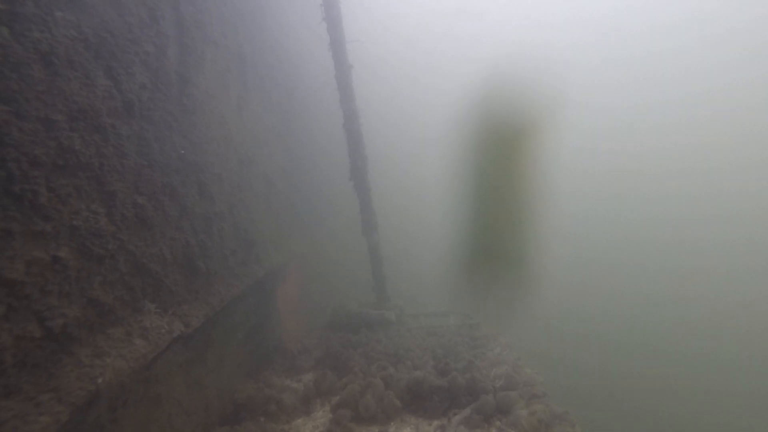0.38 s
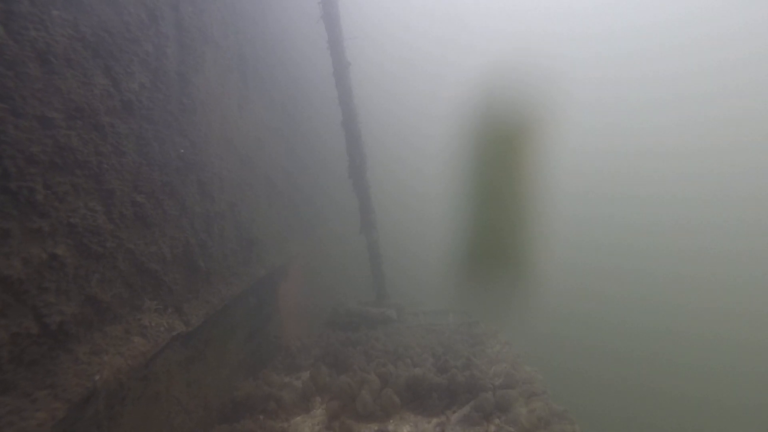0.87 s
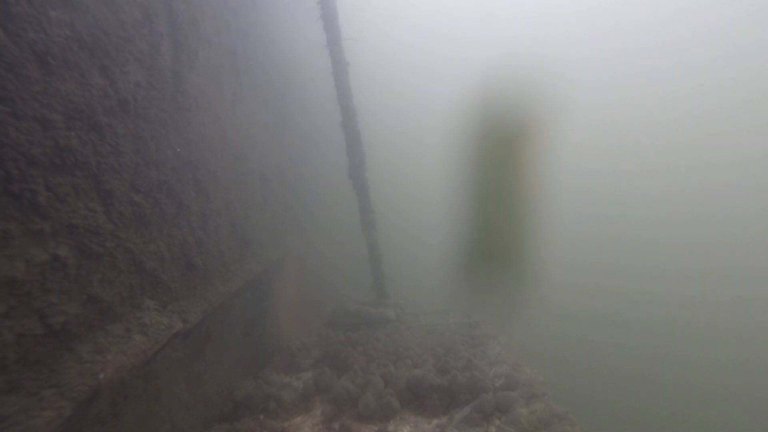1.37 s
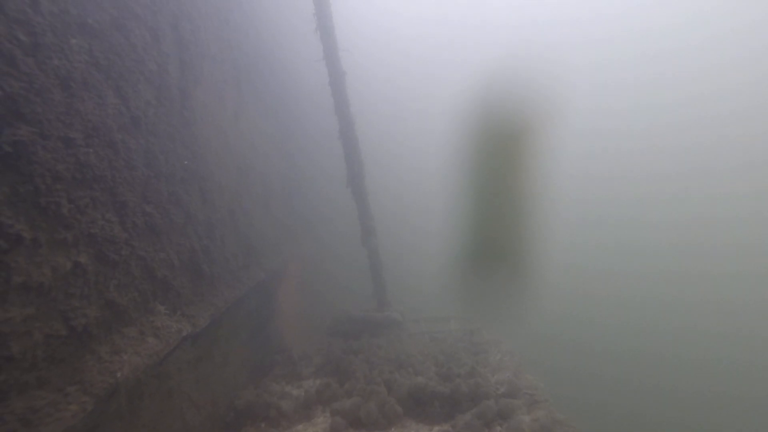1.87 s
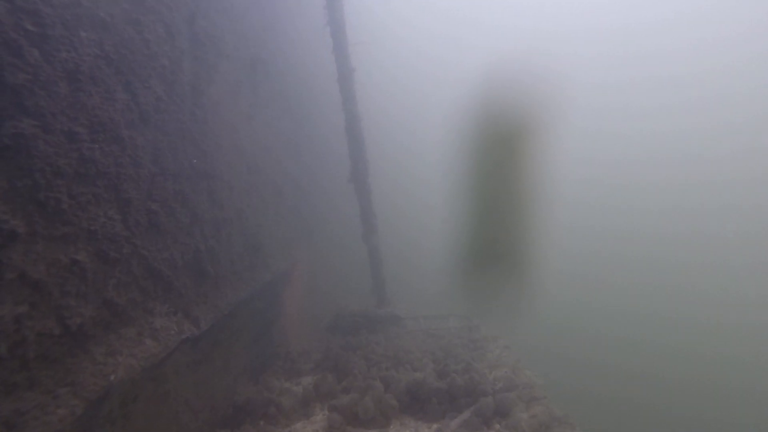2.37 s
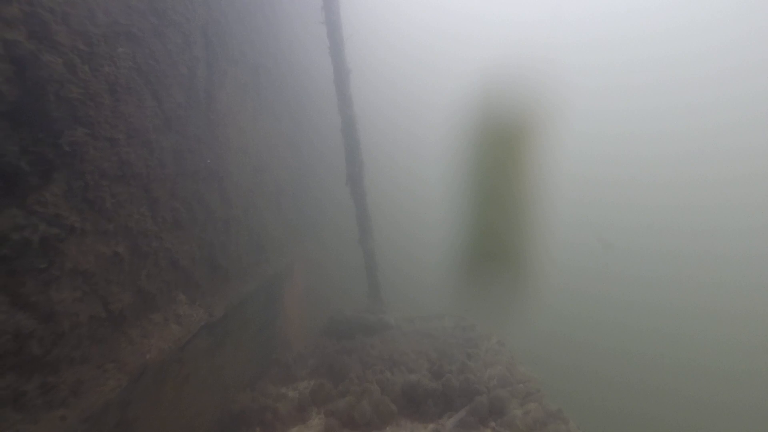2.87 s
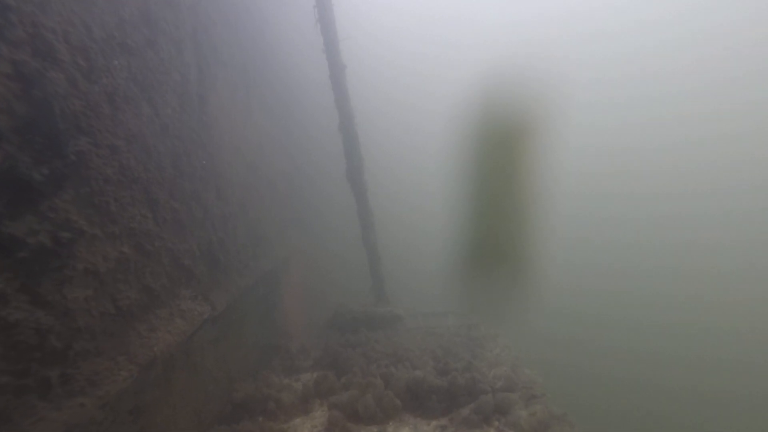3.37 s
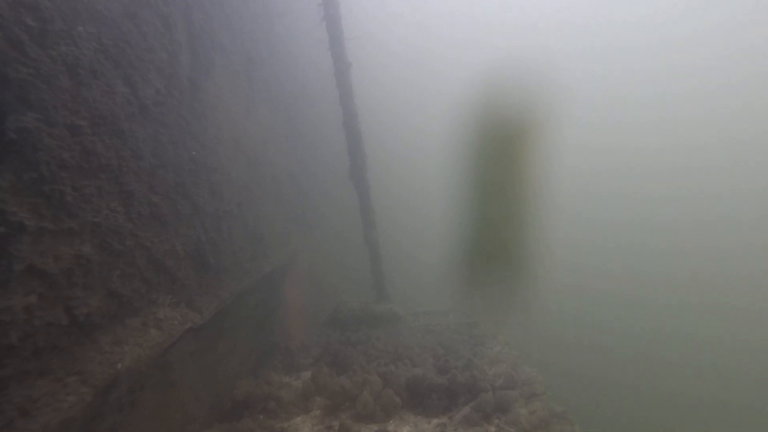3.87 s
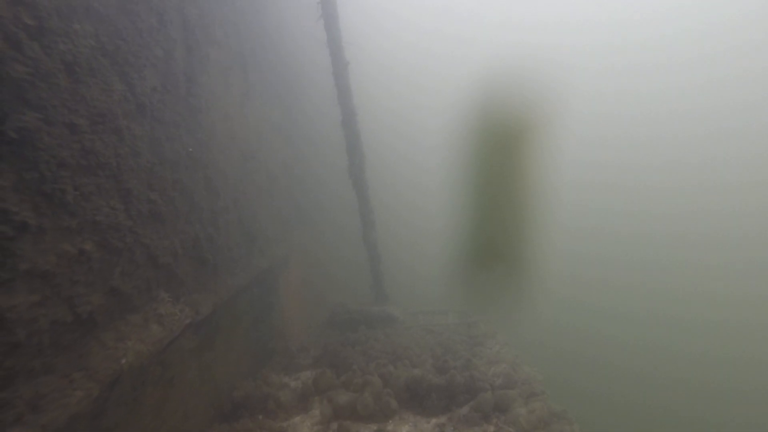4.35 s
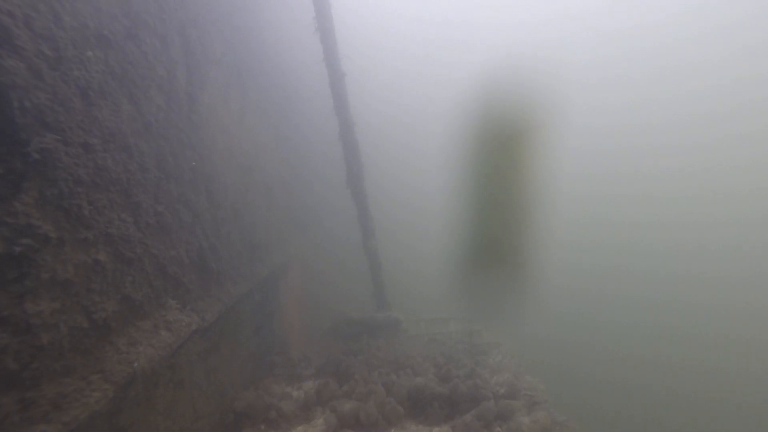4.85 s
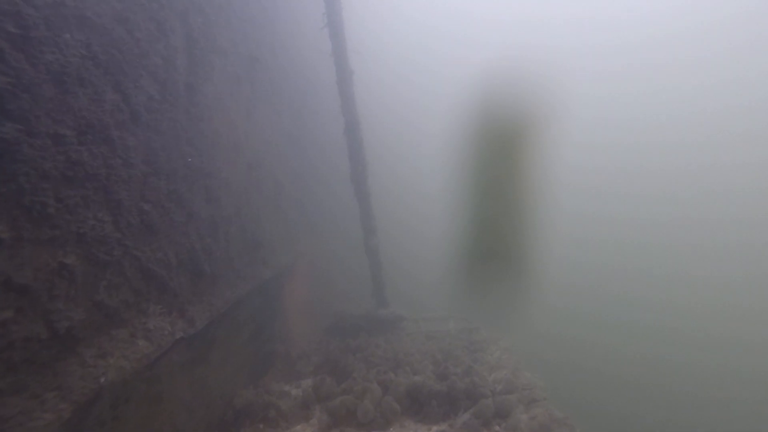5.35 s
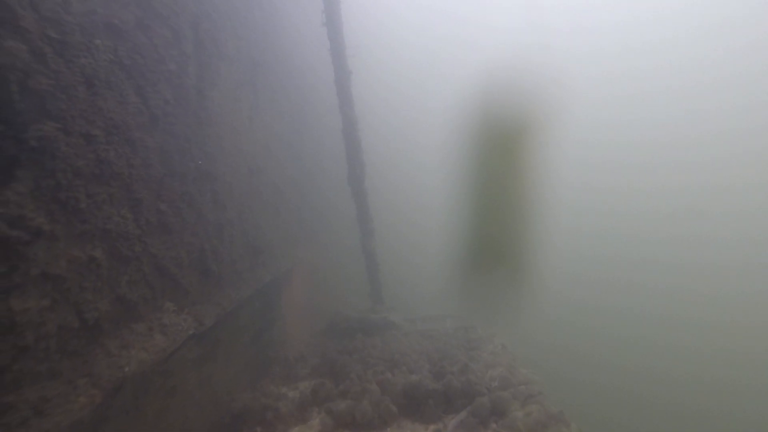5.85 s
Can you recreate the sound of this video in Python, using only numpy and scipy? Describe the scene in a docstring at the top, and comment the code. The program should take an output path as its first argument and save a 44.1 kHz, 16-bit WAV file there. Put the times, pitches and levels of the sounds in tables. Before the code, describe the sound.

Murky harbour underwater: low engine hum and dull wash, sloshing gurgles, hollow knocks, bubbles, and heavy booming thumps on a moored hull.

```python
"""Harbour under water

Heard through a camera housing: a distant engine hums at a low pitch as a few drifting sines, over a
steady dull wash of shaped noise. Waves slosh and gurgle at the quay wall overhead as noise that follows
their levels. Grit ticks, hollow knocks of the housing near 600 Hz and bubbles, mostly higher, are short
dying sines; a moored hull is knocked and rings at its modes. Scattered echoes follow all but hum and water."""
import sys
import numpy as np
from scipy import signal
from scipy.io import wavfile
from scipy.ndimage import uniform_filter1d

SR = 44100
rng = np.random.default_rng(int(sys.argv[2]) if len(sys.argv) > 2 else 0)


def elevation(decibels):
    """Turn decibel levels (scalar or array-like) into linear amplitude ratios."""
    levels = np.asarray(decibels, float)
    return 10 ** (levels / 20)


def bounce(signal):
    """Save signal as a 16-bit WAV file at the path given by the first command-line argument."""
    frames = np.transpose(np.atleast_2d(signal))
    limited = np.clip(frames, -1, 1)
    pcm = np.round(limited * 32767).astype(np.int16)
    wavfile.write(sys.argv[1], SR, pcm)


N = 274743  # length in samples


def evened(x):
    """Normalisation: scales a signal to rms 1."""
    return x / np.sqrt(np.mean(x ** 2) + 1e-20)


def add(mix, start_s, sound):
    """Superposition: mixes a sound in at start_s, cut off at the end of the mix."""
    part = mix[round(start_s * SR):][:len(sound)]
    part += sound[:len(part)]


def slow(top_hz):
    """Random modulation: twelve slow sines of chance phase, up to top_hz, with rms 1 in sum."""
    t = np.arange(N) / SR
    rates = np.geomspace(0.2, top_hz, num=12)
    return evened(sum(np.sin(2 * np.pi * (f * t + rng.random())) / np.sqrt(f) for f in rates))


def noise(spectrum, patchy_db, flicker_db, size):
    """Short-time synthesis: random spectra with drifting patches and a flicker shared by all bins."""
    hz = np.fft.rfftfreq(size, 1 / SR)
    frames = 4 * N // size + 8
    real, imaginary, patches = rng.standard_normal((frames, len(hz), 3)).T
    patches = uniform_filter1d(patches, size=size // 100, axis=0)  # smooth over frequency
    patches = evened(uniform_filter1d(patches, size=6, axis=1))  # smooth over time
    flicker = evened(uniform_filter1d(rng.standard_normal(frames), size=3))
    corner_hz, corner_db = np.transpose(spectrum)
    colour_db = np.interp(np.log(hz + 1), np.log(corner_hz), corner_db, left=-90)[:, None]
    level_db = colour_db + patchy_db * patches + flicker_db * flicker
    spectra = (real + 1j * imaginary) * elevation(level_db)
    return evened(signal.istft(spectra, nperseg=size, noverlap=size - size // 4)[1][:N])


def resonate(x, hz, width):
    """Resonance of gain 1: shifts hz down to zero, smooths with a one-pole filter and shifts back."""
    turn = np.exp(2j * np.pi * hz * np.arange(len(x)) / SR)
    r = np.exp(-np.pi * width / SR)
    return 2 * (turn * signal.lfilter([1 - r], [1, -r], x / turn)).real


def ping(hz, t60, rise, glide=0., sharp=0.):
    """Damped oscillation of peak about 1 with a soft start; it may slide, or start sharp and settle."""
    t60 = max(t60, 0.002)
    t = np.arange(round(SR * (t60 + 4 * abs(rise)))) / SR
    shape = (1 - np.exp(-t / max(rise, 1e-4))) * elevation(-60 * t / t60)
    cycles = hz * (t + glide * t ** 2 / t60)
    cycles += sharp * (1 - np.exp(-hz * t / 0.19))  # the sharp start settles within a cycle
    return shape / shape.max() * np.sin(2 * np.pi * cycles)


# Swells of the hum, one multiple at a time. Each row: middle in seconds, half-width to 1/e in seconds,
# top rms level in dB, multiple of the firing pitch.
HUM_SWELLS = [(0.17, 0.46, -42, 2), (0.076, 0.48, -43, 3), (.25, 0.53, -41, 1), (0.98, 0.23, -38.5, 2),
              (1.16, 0.4, -30.5, 1), (1.6, 0.2, -37.5, 3), (1.8, 0.29, -37.5, 1), (1.78, 0.18, -41.5, 2),
              (2.014, 0.163, -34.5, 3), (1.9, 0.17, -44, 2), (2.33, 0.33, -40, 1), (2.7, .15, -34.5, 1),
              (3.27, .18, -36, 1), (3.15, 0.13, -29.5, 3), (3.67, 0.096, -32, 1), (3.5, .1, -50, 2),
              (3.5, 0.13, -36.5, 3), (3.87, 0.086, -33.5, 3), (4.2, .2, -41, 1), (4.1, 0.13, -40, 2),
              (5.22, 0.29, -33.5, 2), (5.35, 0.16, -37.5, 3), (5, 0.073, -49, 1), (5.85, 0.28, -36.5, 1),
              (8.4, 0.1, -36, 3)]
FIRING_HZ, DRIFT_HZ = 38.75, 0.3  # engine pitch and the rms of its slow drift
HUM_REST_DB = (-55, -48, -50.5)  # resting rms level of multiples 1, 2, 3
NEIGHBOUR_HZ, NEIGHBOUR_DB = 43.27, -46  # wavering tone above the lowest multiple, rms level


def engine():
    """Harmonic series: three multiples of the firing pitch swell singly; narrow noise adds a neighbour."""
    t = np.arange(N) / SR
    turns = np.cumsum(FIRING_HZ + DRIFT_HZ * slow(3.5)) / SR
    levels = elevation(HUM_REST_DB)[:, None] * np.ones(N)
    for middle, width, db, multiple in HUM_SWELLS:
        swell = elevation(db) * np.exp(-((t - middle) / width) ** 2)
        levels[round(multiple) - 1] = np.maximum(levels[round(multiple) - 1], swell)
    hum = sum(np.sqrt(2) * level * np.sin(2 * np.pi * (k * turns + rng.random()))
              for k, level in enumerate(levels, 1))
    neighbour = resonate(rng.standard_normal(N), NEIGHBOUR_HZ, 5.6)
    neighbour = resonate(neighbour, NEIGHBOUR_HZ, 4.7)
    return hum + elevation(NEIGHBOUR_DB) * evened(neighbour)


# Colour of the wash. Each row: frequency in Hz, relative spectral density in dB.
WASH = [(12, -32), (20, 5), (47, -18), (126, -18), (140, -30), (170, -19), (196, -40), (323, -66),
        (549, -15.5), (957, -29.5), (1920, -32), (2400, -31.5), (3350, -33.5), (7300, -43.5),
        (15500, -52.5)]


def wash():
    """Stationary coloured noise: the steady dull wash, at a fixed rms level."""
    return elevation(-48.5) * noise(WASH, 0.67, 0.23, size=2048)


# Waves meeting the wall. Each row: start in seconds, length in seconds, splash level in dB,
# gurgle level in dB before an 8 dB cut, low surge level in dB before the hull's answer.
WAVES = [(0.845, .06, -72, -63, -54), (.92, 0.027, -56, -55, -47), (0.983, 0.037, -58, -47, -45),
         (1.356, 0.099, -52, -48, -40), (1.42, 0.085, -51.5, -66, -37), (1.526, 0.16, -58, -57, -37.5),
         (1.7, 0.37, -60, -45.5, -43.5), (2.151, 0.083, -48, -46, -37), (2.254, 0.044, -47.5, -39.5, -39),
         (2.305, 0.12, -44.5, -39.5, -37.5), (2.473, 0.39, -59, -51, -42.5), (2.695, .03, -55, -39, -36),
         (2.732, 0.033, -51, -36, -38), (2.803, 0.018, -49.5, -32, -37.5),
         (2.857, 0.055, -51, -48.5, -38.5), (2.943, 0.085, -48.5, -28.5, -30),
         (3.079, 0.048, -43, -28, -21), (3.164, 0.012, -43.5, -46, -34), (3.25, 0.027, -56, -40, -30),
         (3.3, 0.31, -55.5, -45.5, -37.5), (3.635, 0.034, -48.5, -36.5, -29.5), (3.72, .16, -54, -43, -36),
         (3.91, 0.087, -56.5, -37, -37), (4.037, 0.45, -59.5, -48.5, -39.5),
         (4.435, 0.033, -47.5, -28.5, -36), (4.48, 0.079, -46.5, -32, -34), (4.582, .12, -55, -40.5, -38),
         (4.722, 0.034, -51, -38.5, -42.5), (4.778, 0.055, -53.5, -33.5, -38),
         (4.847, 0.13, -53, -35.5, -39), (4.954, 0.094, -61, -39.5, -46), (5.06, 0.018, -47, -28.5, -22),
         (5.105, 0.038, -61, -33.5, -45), (5.162, 0.061, -44.5, -34, -26.5),
         (5.237, 0.047, -52.5, -37, -36), (5.3, 0.062, -45, -48, -32.5), (5.383, 0.1, -49, -48, -36),
         (5.445, 0.033, -43, -37, -31), (5.646, 0.021, -55, -43.5, -37.5), (5.774, 0.17, -53, -49.5, -38.5),
         (5.886, 0.039, -60, -50, -34), (5.94, 0.081, -54, -35, -28.5), (6.045, 0.058, -55, -40.5, -35),
         (6.104, 0.011, -52, -30, -25), (6.137, 0.024, -45, -30, -30), (6.195, .02, -63, -33, -25)]
# column in WAVES, calm level in dB, rise in s, fall in dB per s
SPLASH_SHAPE, GURGLE_SHAPE, SURGE_SHAPE = (2, -61, 0.028, 315), (3, -52, 0.023, 250), (4, -46, 0.054, 200)


def wave_db(column, calm_db, rise, fall_db):
    """Power summation: a calm level plus each wave rising, holding for its length and falling away."""
    power = np.full(N, elevation(2 * calm_db))
    for wave in WAVES:
        start, length, db = wave[0], wave[1], wave[column]
        t = np.arange(round(SR * (rise + length + 40 / fall_db))) / SR
        falling_db = db - fall_db * np.maximum(t - length - rise / 2, 0)
        envelope = np.minimum(t / rise, 1) * elevation(falling_db)
        add(power, max(start - rise / 2, 0), envelope ** 2)
    return 10 * np.log10(power)


# Colour of the splash. Each row: frequency in Hz, relative spectral density in dB.
SPLASH = [(250, -22), (500, 11.5), (1000, -0.5), (1300, 4.5), (1750, 2), (2080, -2), (2700, 0), (3100, -3),
          (3500, -9.5), (4800, -11.5), (7000, -18.5), (11000, -23.5), (15500, -55)]


def splash():
    """Amplitude modulation: patchy, flickering noise follows the splash level of the waves."""
    return elevation(wave_db(*SPLASH_SHAPE)) * noise(SPLASH, 3.6, 1.0, size=256)


# Housing resonances that gurgle. Each row: frequency in Hz, width in Hz of each of two stages,
# relative level in dB.
GURGLE = [(581, 217, 3), (650, 82, 4), (740, 69, 0)]


def gurgle():
    """Forced resonance: clumped shoves of water make the housing sound its own notes."""
    clumps = evened(uniform_filter1d(rng.standard_normal(N), size=500))
    shoves = rng.standard_normal(N) * elevation(3.15 * clumps)
    notes = sum(elevation(db) * resonate(resonate(shoves, hz, width), hz, width) for hz, width, db in GURGLE)
    return elevation(wave_db(*GURGLE_SHAPE) - 8) * evened(notes)


# Colour of the surge. Each row: frequency in Hz, relative spectral density in dB.
SURGE = [(15, -20), (35, 7.5), (70, -1.5), (130, -1), (250, -13), (400, -16), (700, -17.5), (2000, -105)]


def surge():
    """Forced vibration: low noise follows the waves and shakes the hull, which answers at its modes."""
    push = elevation(wave_db(*SURGE_SHAPE)) * noise(SURGE, 2.4, 0.55, size=1024)
    answer = sum(elevation(0.29 * db + hz / 40) * resonate(push, hz, 4.8) for hz, db, _ in HULL[:15])
    return push + elevation(-3.5) * answer


# Loud ticks. Each row: start in seconds, level in dB before the split into snap and ping, pitch in Hz.
TICKS = [(.93, -52, 3800), (1.5834, -58, 4940), (1.6597, -40.5, 4570), (1.958, -51, 7200),
         (1.986, -47, 4000), (2.111, -52, 3200), (2.307, -48, 4150), (2.4269, -47, 4800),
         (2.4414, -33.5, 4350), (2.46, -43.5, 4000), (2.418, -48, 6550), (2.6965, -50, 8000),
         (2.83, -49, 6500), (3.3507, -49, 7200), (3.508, -46, 5300), (5.162, -54, 4150),
         (5.4906, -39.5, 5000), (5.539, -40, 3200), (5.589, -56, 1500), (5.7526, -44, 3870),
         (6.1447, -41, 4000)]
SNAP, SNAP_HZ, SNAP_WIDTH_HZ = 0.49, 3200, 4500  # share of broad snap in a tick, its centre and width
FAINT_TICK_DB = -58.5  # lowest level of the scattered ticks, before the same split


def ticks():
    """Impact on the housing: grit gives a brief broad snap and a high ping; faint ones fall at random."""
    out = np.zeros(N)
    faint = [(when * N / SR, FAINT_TICK_DB + 9 * size, 4000 + 3000 * pitch ** 2)
             for when, size, pitch in rng.random((14, 3))]
    dying = elevation(-60 * np.arange(200) / SR / 0.0042)
    for start, db, hz in faint + TICKS:
        crack = resonate(rng.standard_normal(200), SNAP_HZ, SNAP_WIDTH_HZ) * dying
        add(out, start, elevation(db + 10.5) * SNAP * crack / abs(crack).max())
        add(out, start, elevation(db) * (1 - SNAP) * ping(hz, 0.0095, 0.0004))
    return out


# Short dying notes: hollow knocks of the housing near 600 Hz, and clear bubbles, mostly higher.
# Each row: start in seconds, peak level in dB, starting pitch in Hz.
SHORT_NOTES = [(0.843, -40.5, 516), (1.129, -48, 830), (1.674, -49, 2400), (1.8, -52, 1540),
               (2.034, -54, 1590), (2.221, -46, 1637), (2.253, -54, 4850), (2.27, -40, 1090),
               (2.356, -48, 2670), (2.68, -52.5, 2220), (2.71, -51, 1620), (2.762, -50.5, 1700),
               (2.802, -53, 2220), (2.825, -40, 874), (2.954, -45.5, 1533), (3.008, -49, 1060),
               (3.082, -35, 597), (3.142, -26, 620), (3.12, -45, 2400), (3.174, -52, 2490),
               (3.267, -46, 1705), (3.45, -50, 3200), (3.608, -49.5, 2340), (3.641, -45, 615),
               (3.673, -42.5, 1060), (3.68, -44.5, 2890), (3.775, -47.5, 1096), (3.79, -36.5, 612),
               (3.86, -39, 650), (3.915, -47, 1410), (3.966, -33.5, 532), (4.447, -22.5, 596),
               (4.49, -42, 2590), (4.51, -29, 606), (4.737, -43, 1616), (4.845, -34.5, 593),
               (4.893, -31.5, 617), (4.951, -53, 700), (5.082, -45, 1150), (5.09, -34, 693),
               (5.188, -45, 2630), (5.223, -47, 1840), (5.249, -33.5, 620.4), (5.485, -43.5, 1820),
               (5.668, -47.5, 2405), (5.76, -45, 2060), (5.786, -47, 1625), (5.82, -49, 2170),
               (5.822, -43, 1400), (5.828, -51, 1140), (5.852, -43, 1460), (5.869, -49, 1535),
               (5.931, -30.5, 643), (6.108, -31, 594), (5.99, -53, 2830), (6.147, -46, 1570),
               (6.15, -33.5, 824), (6.165, -45, 1124), (6.17, -48, 2050), (6.216, -41, 1030)]
NOTE_T60_S, NOTE_CYCLES = 0.03, 24  # ring time: a fixed part and so many cycles


def short_notes():
    """Damped resonance: housing knocks and clear bubbles, and a bubble swarm that swells with the splash."""
    out = np.zeros(N)
    splash_db = wave_db(*SPLASH_SHAPE)
    for start, db, hz in SHORT_NOTES:
        add(out, start, elevation(db) * ping(hz, NOTE_T60_S + NOTE_CYCLES / hz, 0.0036, glide=0.032))
    for when, pitch, size in rng.random((500, 3)):  # the swarm
        hz = 950 * 11 ** (pitch ** 1.5)
        db = -19.5 + 1.02 * splash_db[int(when * N)]
        db += 11 * size ** 3 - 8 * np.log2(hz / 1000)  # few are loud; higher ones are weaker
        add(out, when * N / SR, elevation(db) * ping(hz, 0.009 + 30 / hz, 0.0011, glide=0.17))
    return out


# Modes of the hull. Each row: frequency in Hz, relative level in dB, t60 in seconds.
HULL = [(81.7, -36, 0.71), (122.2, -1.5, 0.5), (134.8, 0.5, 1.1), (150.4, -10, 0.6), (165.34, 4, 0.44),
        (195, -26, 0.81), (210.6, 2, 0.34), (227.5, -4.5, 0.96), (244, -21, 0.59), (264.9, -1, 0.087),
        (275, -23.5, 0.37), (283.8, -21, 0.37), (291.6, -3.5, 0.367), (355.4, -20.5, 0.19),
        (433, -15.5, 0.25), (487, -33, .4), (596, -25.5, 0.86), (768, -41, .4)]
# Blows on the hull. Each row: start in seconds, thud level in dB, thud pitch in Hz, thud t60 in seconds,
# ring level in dB to which the mode levels are added.
BLOWS = [(0.849, -29, 87, 0.11, -34), (2.191, -16.5, 94, 0.049, -39), (2.254, -17.5, 107, 0.04, -40.5),
         (2.373, -18, 80.4, 0.097, -47.5), (2.951, -24, 253, 0.023, -11.5), (2.955, -4, 238, 0.047, -14),
         (3.144, -22, 210, 0.09, -27), (3.64, -14.5, 123, 0.089, -36), (3.757, -22.5, 129, 0.063, -35.5),
         (3.944, -31.5, 123, 0.15, -37), (4.433, -29.5, 75, 0.082, -47), (4.45, -33.5, 300, 0.088, -34),
         (4.516, -42, 115.7, 0.066, -44), (5.058, -13, 139, 0.2, -36), (5.07, -15.5, 264, 0.011, -43),
         (5.138, -14.5, 275, 0.28, -36), (5.166, -13, 282, 0.1, -20), (5.2, -17, 285, 0.039, -41),
         (5.226, -19.5, 85, 0.1, -45), (5.265, -28, 273.6, 0.15, -23.5), (5.311, -27.5, 271.7, 0.22, -30),
         (5.385, -26, 96, .07, -43), (5.442, -35, 97, 0.075, -44.5), (5.957, -22, 161.5, 0.096, -33),
         (5.958, -18.5, 330, 0.084, -30), (5.977, -16, 322, 0.05, -20.5), (6.009, -23, 132, 0.045, -50),
         (6.107, -16, 125, 0.029, -53), (6.154, -24, 119, 0.047, -41)]
SHOVE_RISE_S, QUICKENING = 0.0075, 0.51  # rise when ring equals thud; a drier blow is quicker (dB per dB)
RING_LAG = 2.1  # the ring rises this many times slower than the thud
BROAD_CYCLES = 4.26  # a thud this short wakes every mode
NARROWING = 2.56  # each further cycle adds this many dB per octave of roll-off


def hull():
    """Modal excitation: each blow is a short thud; the modes near its pitch start together and ring on."""
    out = np.zeros(N)
    for start, thud_db, hz, t60, ring_db in BLOWS:
        rise = SHOVE_RISE_S * elevation(QUICKENING * min(ring_db - thud_db, 0))
        sharp = 0.35 * min(100 / hz, 1) ** 2
        add(out, start, elevation(thud_db) * ping(hz, t60, rise, glide=-0.021, sharp=sharp))
        roll_off = NARROWING * max(hz * t60 - BROAD_CYCLES, 0)  # dB per octave from the thud pitch
        for mode_hz, mode_db, ring_t60 in HULL:
            near_db = -roll_off * abs(np.log2(mode_hz / hz))
            add(out, start, elevation(ring_db + mode_db + near_db) * ping(mode_hz, ring_t60, RING_LAG * rise))
    return out


def basin(x):
    """Reverberation: scattered, dying echoes between the quay walls and the surface."""
    taps = np.zeros(SR // 2)
    slots = np.arange(200, len(taps) - 22, 22)  # one echo at a chance place in each slot of 22 samples
    signs = rng.choice([-1., 1.], len(slots))
    taps[slots + rng.integers(0, 22, len(slots))] = signs * elevation(-60 * slots / SR / 0.58)
    return signal.fftconvolve(x, taps / np.linalg.norm(taps))[:N]


def scene():
    """Superposition: all sources and the echoes meet at one microphone."""
    water = wash() + splash() + gurgle() + surge()
    small = ticks() + short_notes()
    hull_blows = hull()
    echoes = basin(elevation(-10.5) * hull_blows + elevation(-15.5) * small)
    return (engine() + water + small + hull_blows + echoes)[None]


# Resonances of the housing that lift all sound. Each row: frequency in Hz, width in Hz,
# level in dB against the direct path.
HOUSING = [(1123, 100, -3.5), (1650, 180, -2.5), (2280, 320, 1.5), (2820, 83, -10), (3030, 240, -9),
           (3990, 330, -3.5), (4780, 350, -8), (6520, 180, -3.5), (7200, 220, -3)]


def housing(x):
    """Parallel resonance: the notes of the housing add to the direct sound."""
    return x + sum(elevation(db) * resonate(x, hz, width) for hz, width, db in HOUSING)


def top_cut(x):
    """Nothing passes above the cut-off."""
    return signal.sosfilt(signal.butter(12, 15620, fs=SR, output="sos"), x)


def record(dry):
    """Linear filtering: the housing colours the sound, then the band is limited at both ends."""
    x = housing(dry[0])
    # the microphone drops the deepest bass
    x = signal.sosfilt(signal.butter(2, 27, "high", fs=SR, output="sos"), x)
    low_pass = signal.firwin(255, 15250, fs=SR)
    x = signal.oaconvolve(np.pad(x, 127, "reflect"), low_pass, "valid")
    mix = elevation(-3.0) * x[None]
    return top_cut(mix)


dry = scene()
out = record(dry)
bounce(out)
```